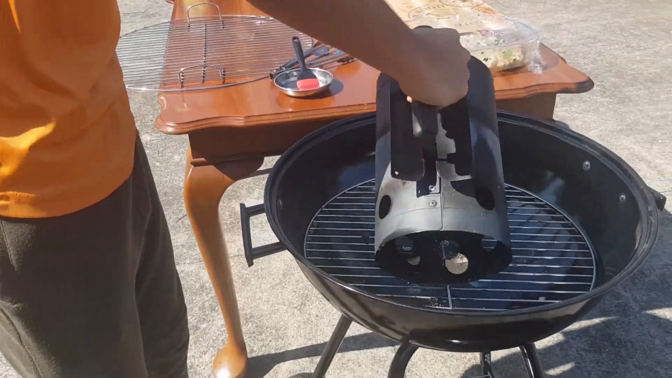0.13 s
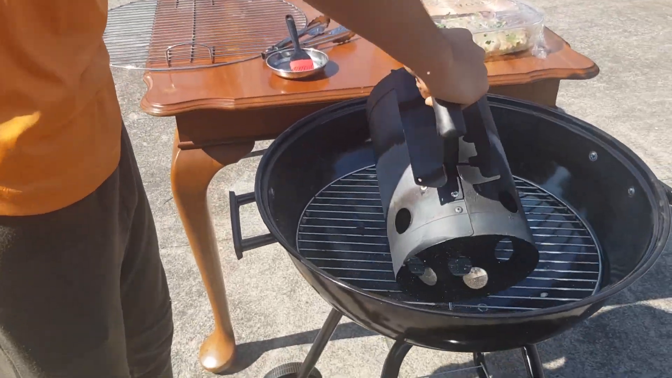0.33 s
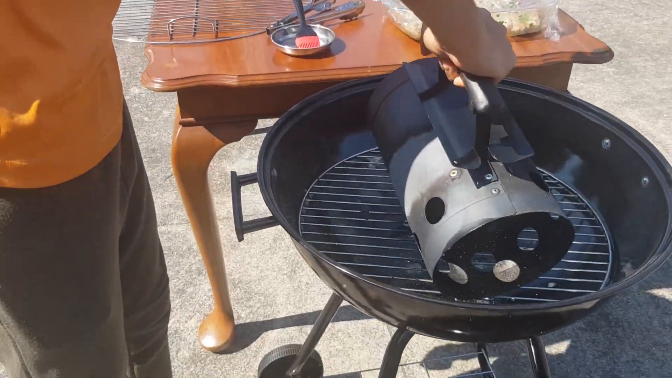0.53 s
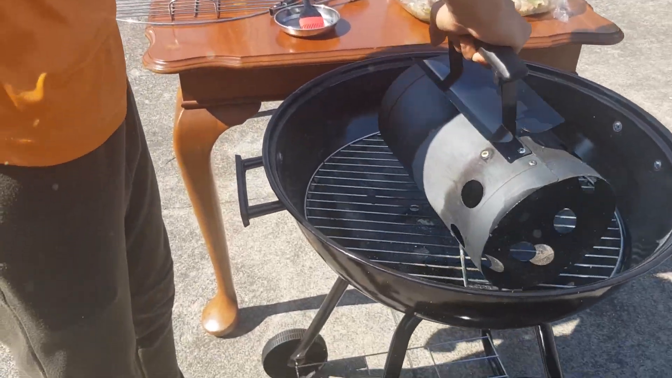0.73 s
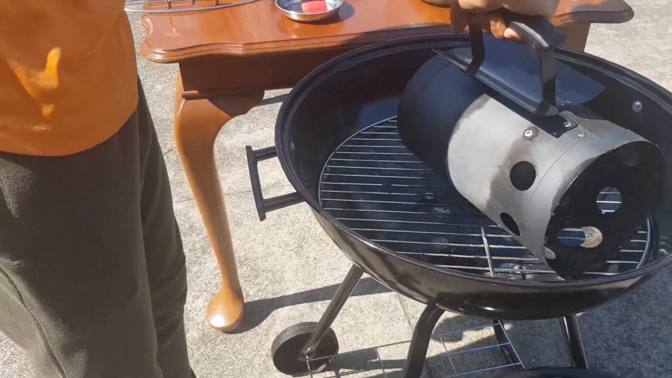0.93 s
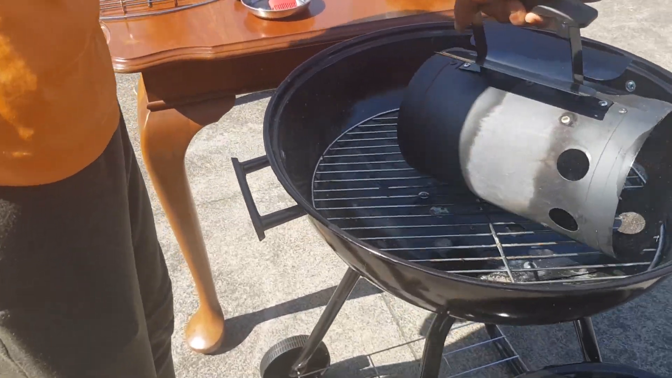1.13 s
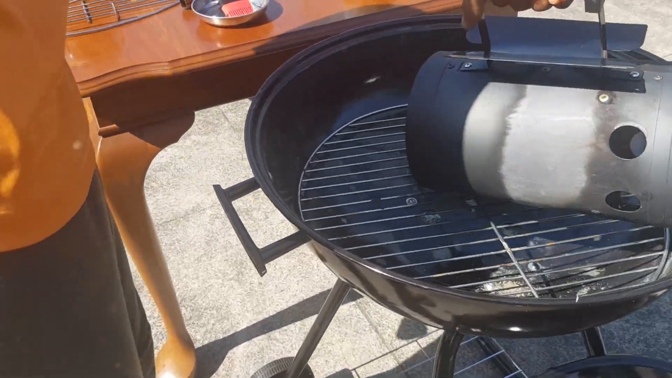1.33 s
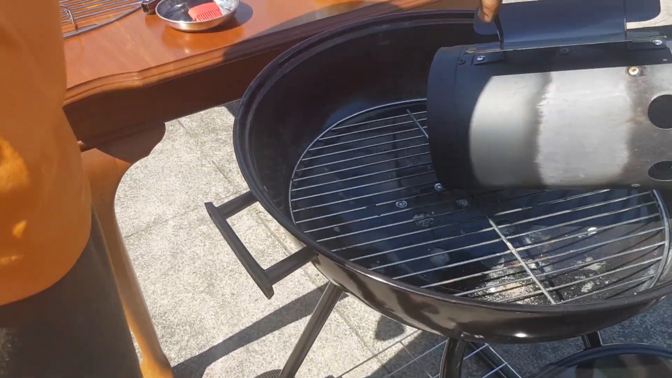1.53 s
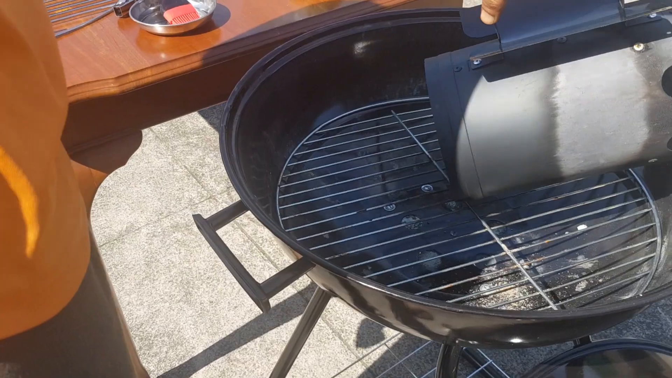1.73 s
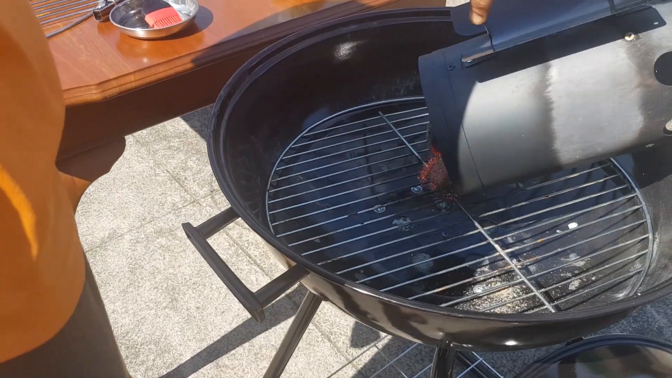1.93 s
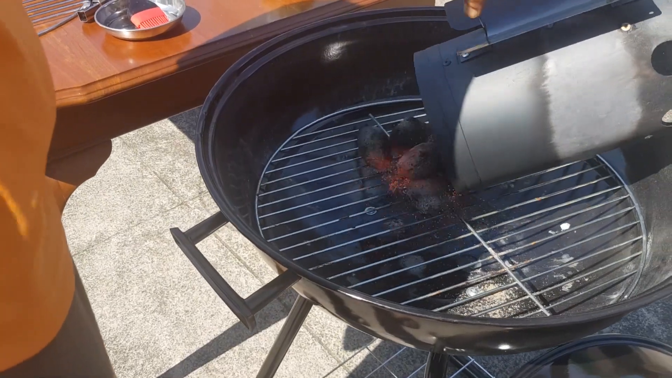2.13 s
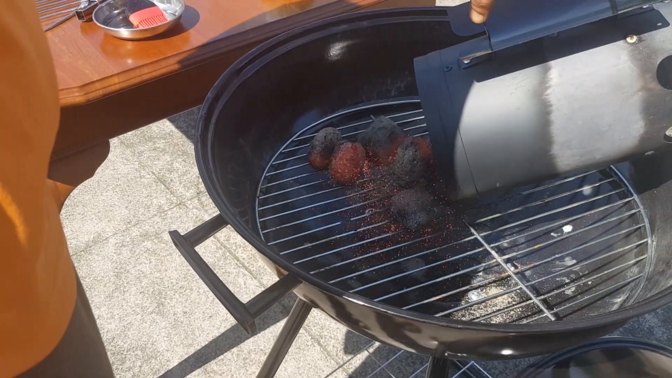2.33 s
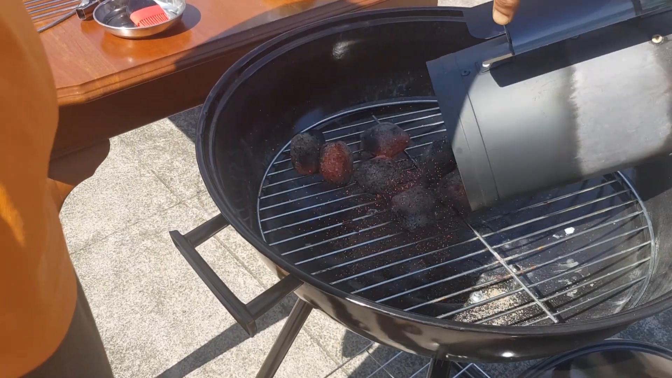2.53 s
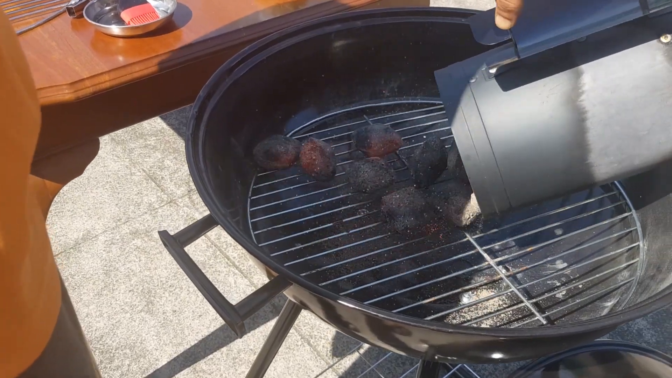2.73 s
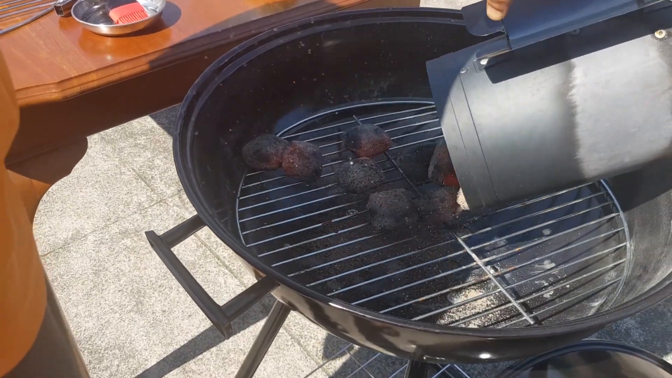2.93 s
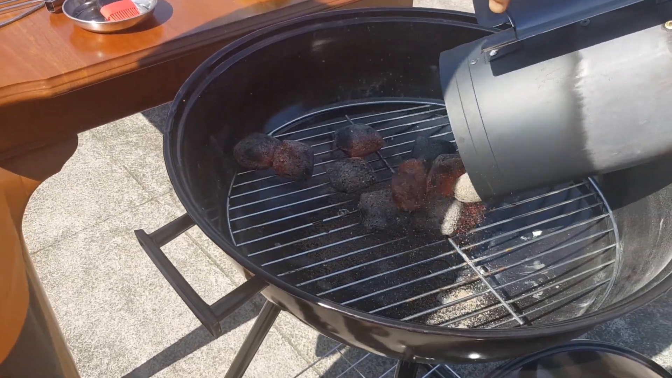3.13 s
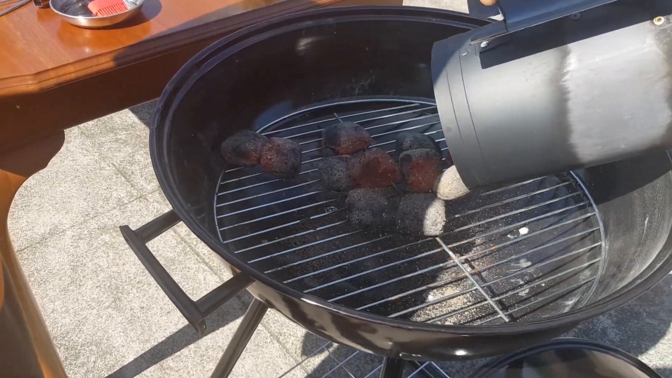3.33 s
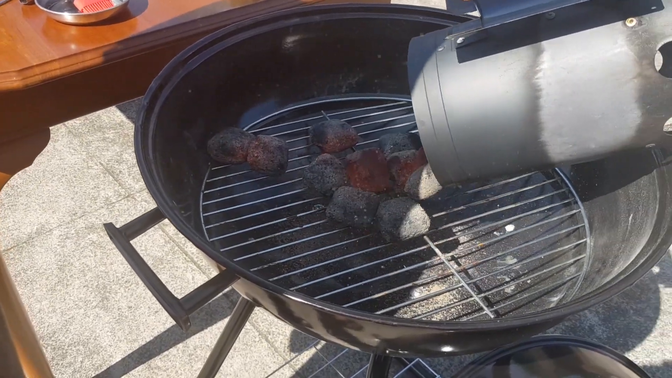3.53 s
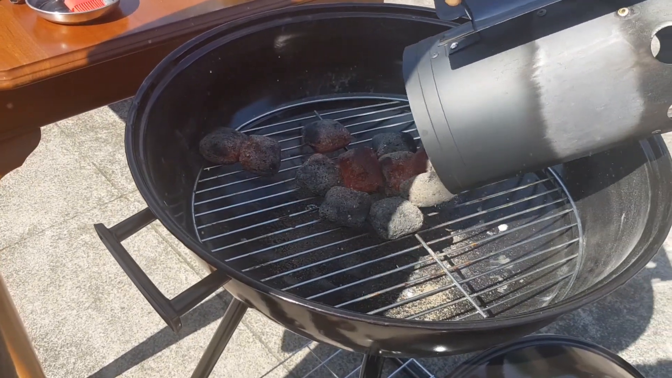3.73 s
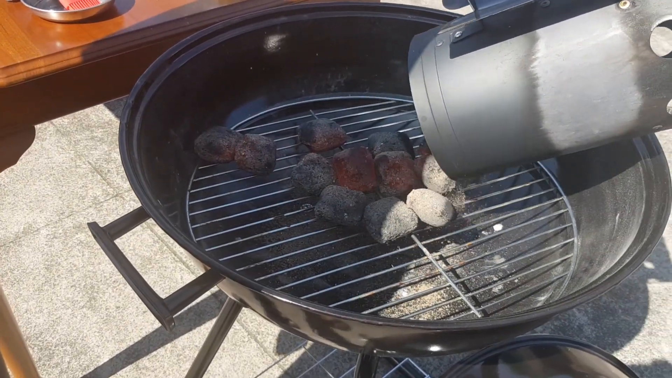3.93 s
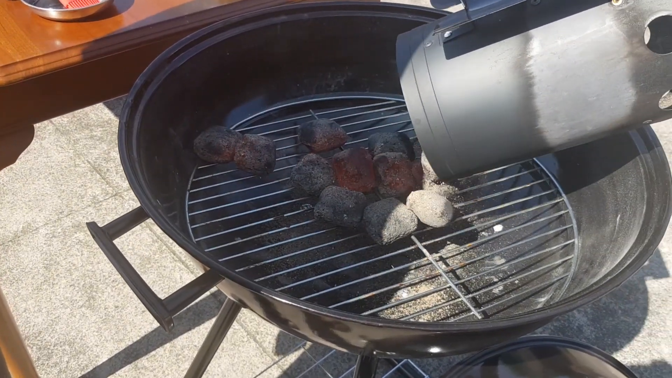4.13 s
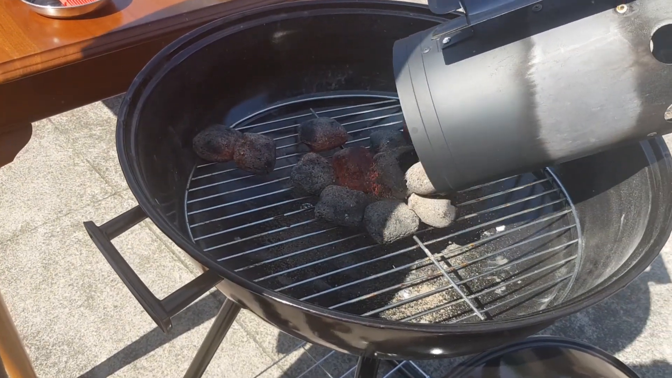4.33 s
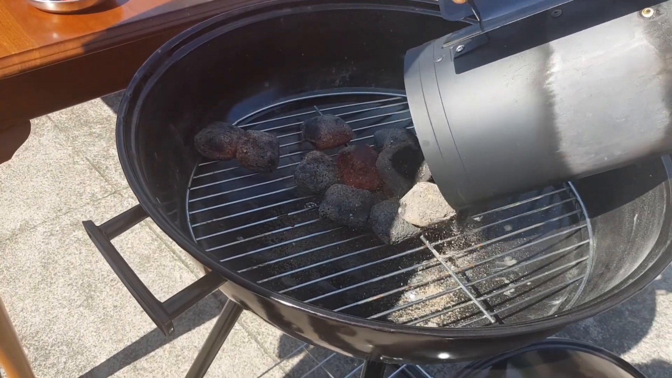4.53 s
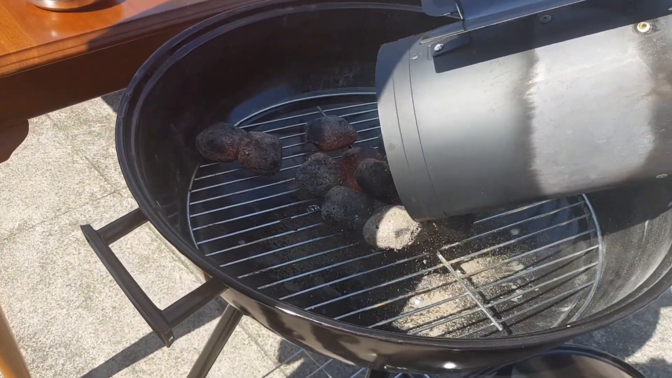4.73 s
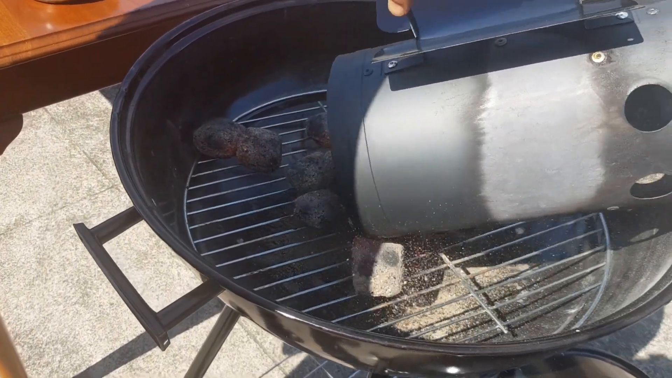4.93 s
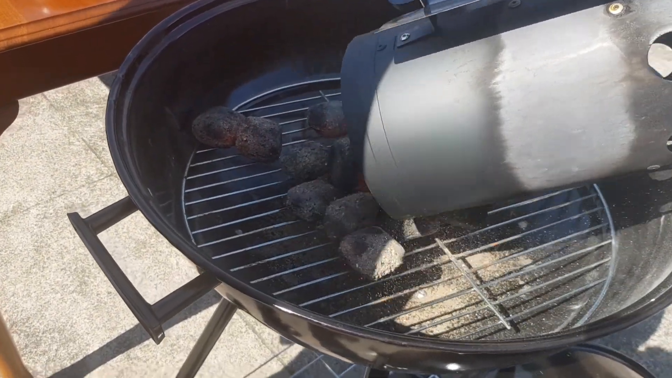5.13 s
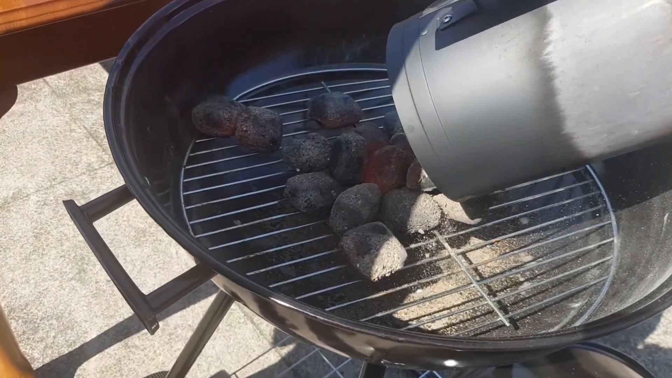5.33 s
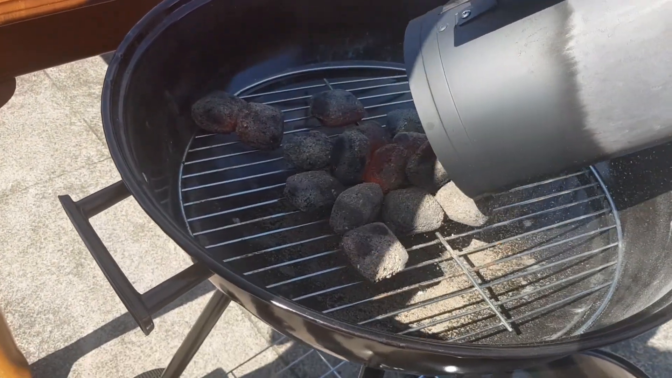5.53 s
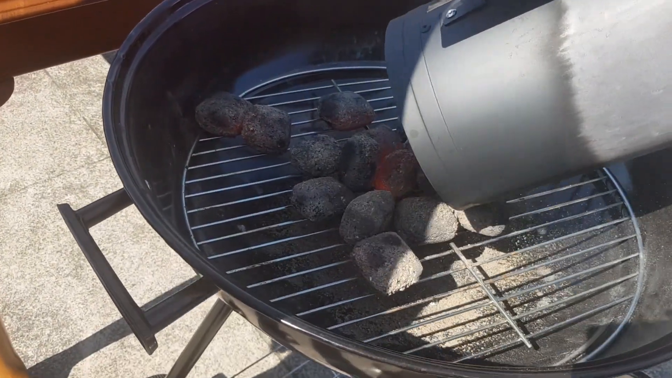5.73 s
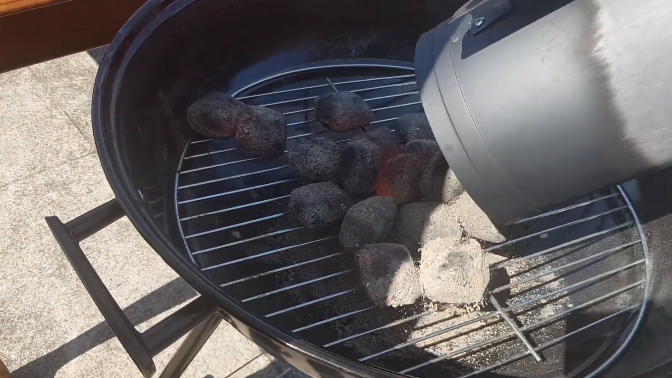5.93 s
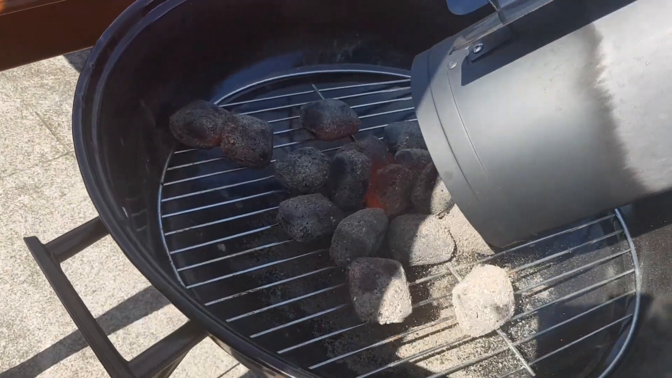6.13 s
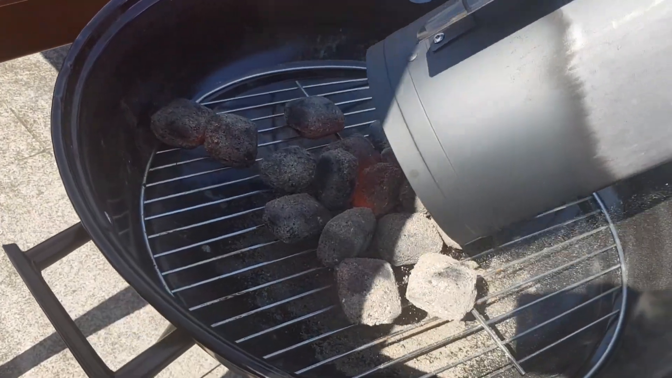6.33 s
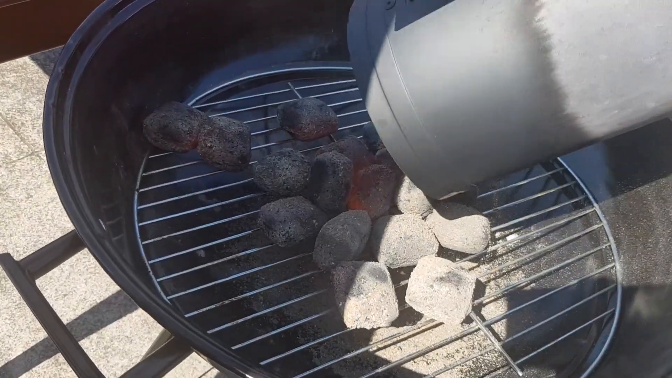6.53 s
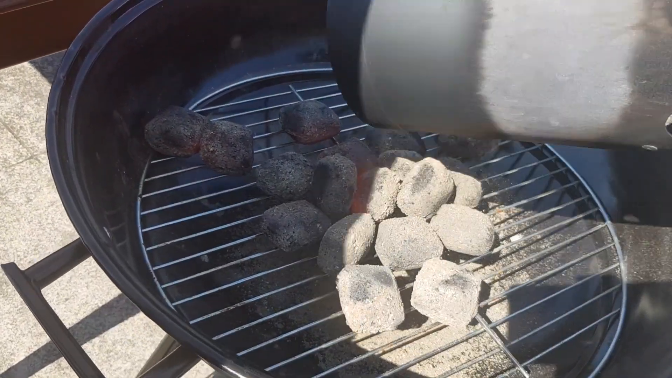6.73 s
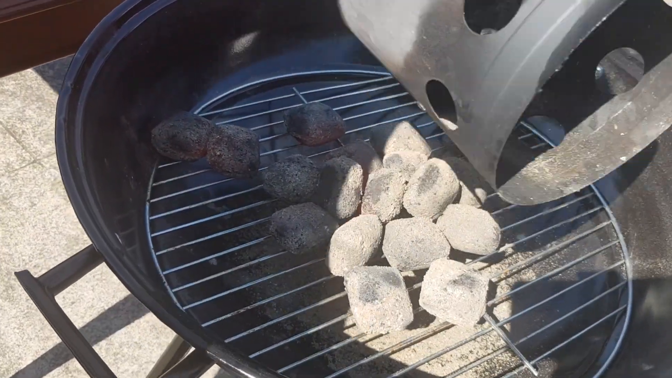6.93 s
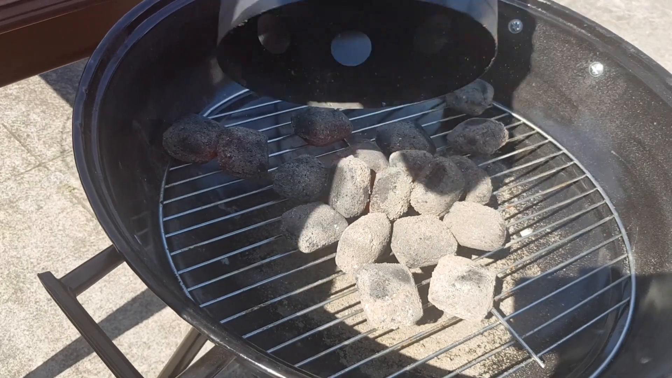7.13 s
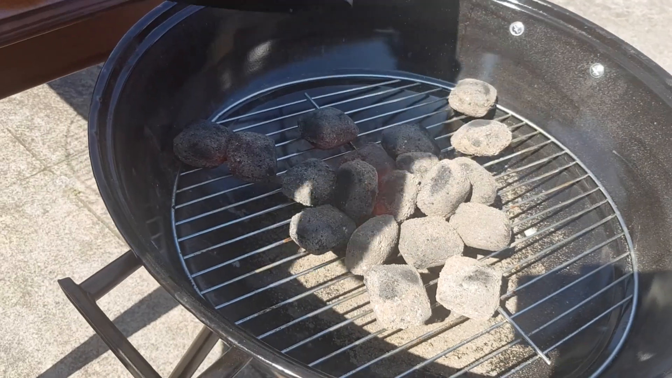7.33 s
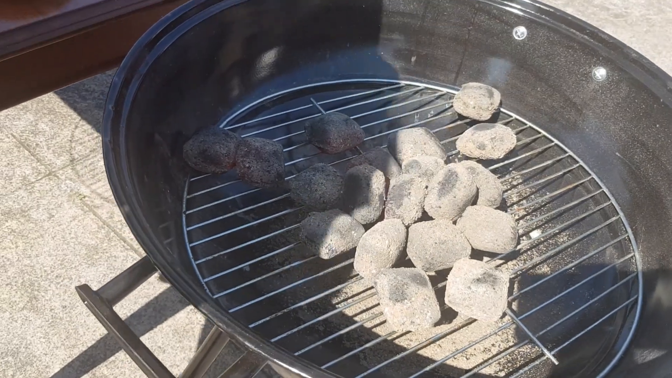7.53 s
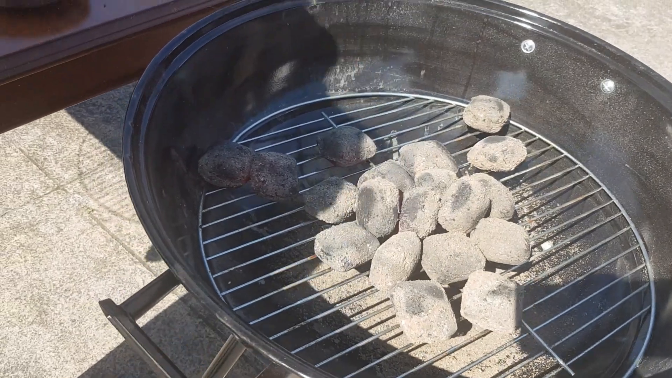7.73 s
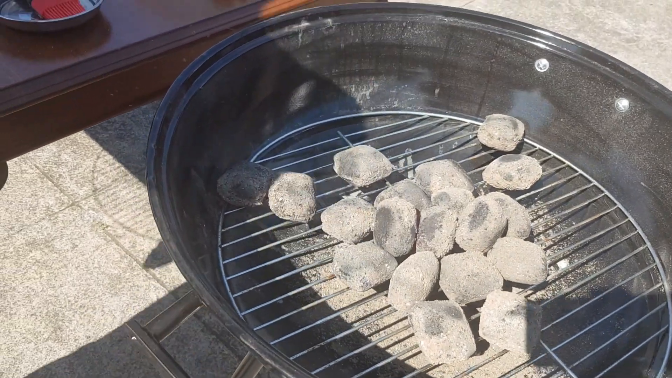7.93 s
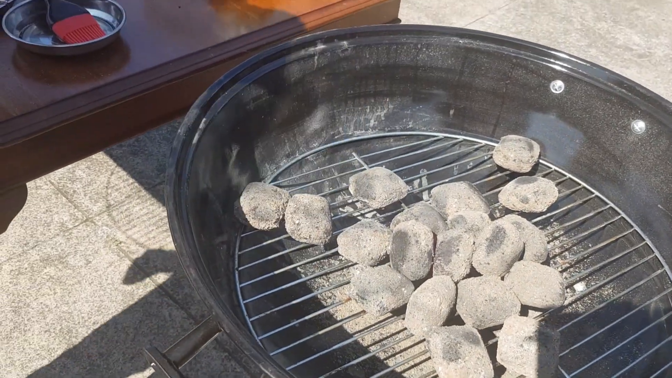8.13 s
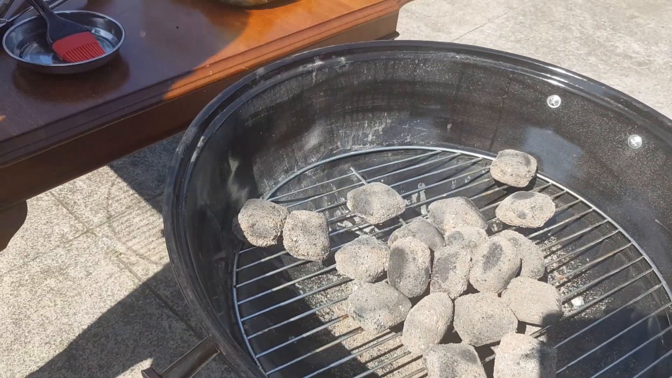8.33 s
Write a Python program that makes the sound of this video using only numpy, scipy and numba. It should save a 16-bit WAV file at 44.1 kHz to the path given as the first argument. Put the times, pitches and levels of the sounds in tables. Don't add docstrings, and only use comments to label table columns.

```python
import sys
import numpy as np
from scipy import signal
from scipy.fft import rfft, irfft
from scipy.io import wavfile
from scipy.ndimage import uniform_filter1d
from numba import njit

SR = 44100
rng = np.random.default_rng(int(sys.argv[2]) if len(sys.argv) > 2 else 0)


def attenuation_scalar(level_db):
    decades = np.asarray(level_db, float) / 20
    return 10 ** decades


def dump_mix(stems):
    frames = np.atleast_2d(stems).T
    limited = np.clip(frames, -1, 1)
    pcm = np.round(limited * 32767).astype(np.int16)
    wavfile.write(sys.argv[1], SR, pcm)


N = 370080
T = np.arange(N) / SR
POUR_S = 1.78

# (frequency [Hz], level [dB per Hz])
YARD_SPECTRUM = [(380, -34.5), (650, -4.5), (1100, -10), (2060, -9.5), (4360, -0.5), (4990, -2),
                 (6350, -9.5), (11800, -8), (15200, -9), (16000, -5.5)]
# (time [s], level [dB])
YARD_SWELL = [(0, 7), (.9, 1.5), (1.25, 1), (1.6, 3.5), (6.6, -0.5), (6.85, 0.5), (7.05, -1.5), (7.5, -0.5),
              (8.0, -2), (8.15, -4), (8.39, -2)]
# (middle [s], half length [s], buffet [dB], flutter re buffet [dB], left minus right [dB])
GUSTS = [(0.683, 0.2, -48.5, -10.5, 4), (0.92, 0.1, -55.5, -12, -24), (1.05, 0.12, -51, -2, 7),
         (1.223, 0.14, -39, -9, 0.5), (1.495, 0.085, -37.5, -10.5, 0), (1.817, 0.14, -37, -7, -9.5),
         (2.043, 0.042, -30.5, -6.5, 0), (2.217, 0.11, -64, -5, -23.5), (2.299, 0.018, -38, -6, -4),
         (4.645, .05, -53.5, -16, 0), (7.209, 0.033, -53, -11, -7.5), (2.568, 0.26, -46, -3, 4.5),
         (3.158, 0.11, -49, -5.5, -7), (4.897, 0.12, -49.5, 0, 1), (5.296, 0.24, -47, -2.5, -12),
         (5.505, 0.076, -41, 3, 0), (5.732, 0.11, -36, -9, -3), (5.964, 0.041, -35.5, -6, -6),
         (6.416, 0.42, -59, 1.5, -10.5), (6.776, 0.082, -51, -13.5, -19.5), (7.067, 0.13, -53.5, -5, -1.5),
         (7.58, 0.28, -49, -7.5, -0.5), (8.115, 0.48, -56.5, -8.5, 7.5), (8.229, 0.087, -51.5, 2, -0.5)]
# (time [s], peak [dB], pitch [Hz], left minus right [dB])
PUFFS = [(0.535, -30.5, 61, -2), (0.605, -25.5, 63.7, -1), (0.823, -37.5, 67, -23), (0.97, -21, 68, -3),
         (1.001, -20.5, 81, 8), (1.06, -26.5, 101, 4), (1.113, -42.5, 81.4, -44), (1.149, -31.5, 45.8, -12),
         (1.122, -47, 377, 0), (1.162, -40, 290, 0), (1.249, -45, 300, 2), (1.292, -33.5, 237, -11),
         (1.385, -36, 188, -2), (1.42, -42, 56.7, -12), (1.444, -16.5, 64, -2), (1.682, -33.5, 134, -24),
         (1.757, -29, 89, -23), (2.028, -36, 62, -1), (2.357, -37.5, 106, 0), (3.163, -38, 73, -20),
         (5.219, -25, 66.4, -5), (5.29, -17, 70, 0), (5.465, -37, 67, -35), (5.68, -26, 113, 8),
         (5.931, -29, 107.4, 8), (6.741, -40, 75.6, -18), (7.449, -30.5, 97.6, 7.5), (7.567, -29, 61, 2.5),
         (7.69, -41, 58.4, 5.5), (7.791, -35.5, 121.7, 11.5), (7.865, -37.5, 58.1, -19.5),
         (8.068, -37, 61.6, -3), (8.155, -34.5, 94, 13), (8.248, -49, 67.3, 25.5)]
# (time [s], flow felt by the grate [dB], can re grate [dB])
TRICKLE = [(0.0, -62.5, 1), (0.14, -74, 22), (0.37, -75, 10.5), (0.75, -66.5, 4.5), (1.33, -83.5, 13),
           (1.75, -70, 2), (2.62, -49, -14), (2.99, -56.5, -3), (3.2, -43.5, -16), (3.64, -57, 1.5),
           (4.3, -62.5, 0), (4.6, -51, -6), (5.0, -46.5, -2.5), (5.26, -46.5, -8), (5.42, -78.5, 13.5),
           (5.7, -49, -3), (6.17, -60.5, -9), (6.6, -104, 10)]
# (time [s], flow felt by the grate [dB], can re grate [dB])
POUR = [
    (1.818, -48, -3.5),
    (1.98, -37, 5),
    (2.05, -18.5, -8.5),
    (2.1, -16.5, -3.5),
    (2.16, -23, -3),
    (2.22, -23.5, -8.5),
    (2.289, -33, -5.5),
    (2.35, -36, -17),
    (2.62, -74, 18.5),
]
# (time [s], can [dB], grate re can [dB], bowl re
# can [dB], grit re can [dB])
KNOCKS = [(0.1242, -35.5, -7.5, -16, -4), (1.495, -44, -6, -13, 0.5), (2.676, -34, 0.5, -2, -11),
          (2.933, -37.5, -7.5, -9, -10), (2.984, -39.5, -1.5, -7.5, -8), (3.0459, -37.5, 0.5, 2.5, -20),
          (3.075, -37, 8, -1.5, -7.5), (3.1097, -37.5, -3, -7, -5), (3.16, -30.5, -6, -7.5, -9),
          (3.2027, -40, -9, -15, -7), (3.2293, -25, -3.5, -4.5, -8), (3.411, -32.5, -1.5, -5.5, -9.5),
          (3.912, -23.5, -8, -10, -9), (4.5353, -39, -16, -19, -7), (5.243, -44, 14, 15.5, -24.5),
          (5.909, -35.5, -4, -5, -12), (6.241, -37.5, 3, 1, -13), (6.6718, -54.5, 5.5, 3.5, -4),
          (6.786, -53.5, -6, -10.5, -7), (7.332, -46.5, -13, -7, -9),
          (1.935, -34.5, 7, 9, -15), (1.9733, -22.5, -9, 2, -8), (2.021, -13, -3.5, -16.5, -17),
               (2.033, -25.5, 0, -5, -9), (2.0662, -22.5, 2, -9.5, -6), (2.0853, -17, 0.5, -1, -11.5),
               (2.0941, -12.5, 4.5, -11, -8.5), (2.11, -25, -4, -16, -14), (2.122, -15.5, 5, -10.5, -9),
               (2.137, -28, 0.5, -16, -14), (2.152, -18, 5.5, -21, -12), (2.164, -28, 11, -2, -17.5),
               (2.182, -21, 5, -10.5, -12), (2.204, -21, 3, -4.5, -8), (2.237, -29, 7, -7, -3),
               (2.252, -22, 5.5, -8.5, -22), (2.275, -23.5, -6, -24, -34), (2.309, -28, -7, -18, -19),
               (4.8159, -21, 1, -1, -5.5), (4.892, -32.5, 2.5, 3, -2.5), (5.0206, -40.5, -9, -0.5, 0),
               (5.0673, -38, -8, -10, -5), (5.6736, -44, -5, -9, -13), (5.809, -35.5, 4.5, -3.5, -8),
               (5.986, -28.5, -7, -13, -9), (6.004, -33, -10, -5.5, -13), (6.302, -31.5, 4, -8, -15)]
# (time [s], blow [dB], bowl re blow [dB], can re blow [dB], chatter length [s])
SHIFTS = [
    (0.163, -38.5, -14.5, -5.5, 0.022),
    (0.271, -39, -4, -33, 0.0029),
    (0.698, -43.5, -84, -5, 0.017),
    (0.755, -34, -14.5, -5, 0.0063),
    (1.396, -43.5, -35, -0.5, 0.019),
    (1.681, -40.5, -12, -1, 0.061),
]
# (time [s], blow [dB], bowl and can re blow [dB], chatter length [s])
RUSH_LUMPS = [
    (1.821, -26, -5, -6, 0.0087),
    (1.923, -10.5, -13, -9, 0.005),
    (1.96, -19, -29, -13, 0.034),
    (2.0208, -5, -15, -3, 0.0037),
    (2.394, -22, -19, -10, 0.023),
    (2.578, -39, -1, -9, 0.0045),
    (2.622, -34.5, -19, -2.5, 0.0076),
    (2.741, -29.5, -15, -11, 0.0051),
]
# (time [s], blow [dB], bowl and can re blow [dB], chatter length [s])
SHAKEN_LUMPS = [(3.7763, -20.5, -13.5, -9, 0.011), (3.9037, -16.5, -13, -10, 0.018),
                (4.022, -34.5, -14, -25, 0.026), (4.076, -39, -10, -4.5, 0.049),
                (4.23, -39, -7, -15, 0.021), (4.305, -30.5, -11.5, -12.5, 0.015),
                (4.376, -35.5, -9.5, -3, 0.015), (4.57, -17.5, -11.5, -13, 0.012),
                (4.796, -16.5, -13, -11.5, 0.027), (4.914, -36, -4, -4.5, 0.03),
                (5.086, -26.5, -7.5, -12, 0.0072), (5.374, -30, -7, -15.5, 0.007),
                (5.429, -35, -23.5, -8.5, 0.0037), (5.65, -44, -7, 6.5, 0.016),
                (5.804, -24, -11, -23.5, 0.0035), (5.962, -9, -14.5, -11, 0.0075),
                (5.974, -12.5, -15, -1, 0.002), (6.156, -30.5, -9.5, -6, 0.002),
                (6.2889, -20.5, -15, -17, 0.0064), (6.396, -38, -13, -8.5, 0.0082)]
# (lowest [Hz], highest [Hz], time to fade 60 dB [s], blow [dB], slide [dB], side re mid [dB])
PARTS = [
    (1178, 3280, 0.18, -5.5, -3, -3),
    (70, 956, 0.24, 4.5, -9, -11.5),
    (2410, 6380, 0.23, -1.5, -1.5, 0.5),
    (7170, 13900, 0.19, 5, -1.5, 0.5),
]
# (frequency [Hz], level [dB per Hz])
STEEL_SPECTRUM = [(60, -24.5), (130, -19.5), (200, -12.5), (286, -16), (341, -12.5), (466, -10.5),
                  (560, -17.5), (680, -20), (1040, -21.5), (1240, -9), (1580, -3), (2600, -16.5),
                  (4800, -14), (7300, -20), (9200, -20.5), (16000, -27)]
# (frequency [Hz], level [dB per Hz])
CAN_SPECTRUM = [(180, -5.5), (300, -6.5), (385, -1.5), (1390, -14.5), (1560, -9.5), (2170, -6.5),
                (3030, -13), (10700, -9), (16000, -16)]
# (frequency [Hz], level [dB], time to fade 60 dB [s])
GRATE_MODES = [(1330, -28, .1), (1483, -13, .18), (1555, -9.5, .21), (1626, -11, .18), (1845, -15, .13),
               (2012, -16, .13), (2105, -15, .13), (2417, -16, .15)]
# (frequency [Hz], level [dB], time to fade 60 dB [s])
BOWL_MODES = [(338, -15, .13), (555, -20, .1), (581, -34, 1.0), (750, -35, 1.0)]
# (frequency [Hz], level [dB], time to fade 60 dB [s])
SHELL_MODES = [(2900, -18, .1), (3114, -13.5, 0.2), (3800, -32, 0.21), (4678, -23.5, 0.056),
               (4710, -27, 0.071), (5000, -15, 0.082)]
# (time [s], peak [dB])
TICKS = [(0.3336, -47), (0.404, -45), (0.454, -44), (0.4854, -49), (0.5417, -45), (2.5012, -40),
         (4.0672, -47), (4.0816, -48), (4.399, -29), (4.5354, -38), (4.9327, -31), (4.996, -36),
         (5.1741, -37), (5.3044, -40.5), (5.5428, -45), (5.6341, -36), (5.7508, -38), (5.7972, -38),
         (5.903, -41.5), (7.1906, -56.5)]
# (time [s], level [dB], pitch [Hz], width [Hz], decay [s])
TAPS = [(0.337, -46, 4320, 900, 0.0096), (0.402, -42, 4300, 900, 0.012), (.455, -50, 4320, 700, 0.011),
        (0.486, -44, 4220, 700, 0.0061), (.54, -49, 4260, 400, 0.0059), (1.59, -50.5, 4850, 294, 0.015),
        (6.589, -44, 576, 375, 0.0095), (7.153, -54, 1027, 920, 0.041), (7.17, -54, 3910, 5980, 0.03),
        (7.444, -54.5, 1150, 706, 0.024), (7.445, -55, 3010, 905, 0.021), (7.76, -55, 5980, 5000, 0.0065),
        (7.936, -57, 4830, 1502, .008), (8.019, -65, 1303, 880, 0.024)]
# (time [s], level [dB])
EMBERS = [(1.64, -80), (1.72, -54), (1.9, -39), (2.2, -63), (2.4, -77), (2.6, -74), (2.75, -79),
          (2.97, -71), (3.13, -55), (3.4, -68), (3.55, -63.5), (3.7, -54.5), (3.87, -56), (4.15, -55),
          (4.27, -62), (4.4, -67), (4.6, -61), (4.98, -55), (5.2, -69), (5.44, -69), (5.7, -69), (5.9, -75),
          (6.1, -80)]
# (time [s], level [dB], pitch [Hz], width [Hz], decay [s])
RATTLES = [(1.711, -70, 2170, 700, 0.062), (2.061, -21.5, 4420, 500, 0.093), (2.091, -29, 5170, 597, 0.14),
           (2.17, -29, 3300, 400, 0.061), (2.23, -28, 4200, 490, 0.033), (3.05, -47, 5000, 700, 0.11),
           (3.331, -55, 5000, 900, 0.19), (3.78, -47, 3000, 500, 0.079), (3.911, -33, 1910, 400, 0.028),
           (3.915, -36, 5070, 500, .03), (4.02, -43.5, 5000, 500, 0.024), (4.175, -49, 3620, 200, 0.026),
           (4.315, -48, 2900, 500, 0.029), (4.39, -52, 4600, 1500, 0.031), (4.582, -30, 2500, 900, 0.0093),
           (4.721, -53.5, 5270, 600, 0.18), (4.405, -40.5, 2300, 200, 0.022),
           (4.809, -31, 3180, 250, 0.043), (4.88, -40.5, 3230, 200, 0.099), (4.921, -41, 1960, 300, 0.045),
           (5.04, -52, 3380, 300, 0.099), (5.07, -43, 1960, 300, 0.047), (5.08, -50, 5200, 506, 0.032),
           (5.16, -51.5, 5050, 600, 0.067), (5.181, -53, 3300, 400, 0.049), (5.245, -49, 3320, 300, 0.032),
           (5.645, -49, 2330, 200, 0.11), (5.662, -48, 3330, 200, 0.08), (5.65, -47, 4350, 302, 0.051),
           (5.72, -46, 5300, 400, 0.024), (5.81, -40, 3880, 200, 0.015), (5.91, -44, 2800, 250, 0.018),
           (5.925, -33, 1640, 300, 0.012), (5.975, -15.5, 5020, 397, 0.0098)]
# (time [s], frequency [Hz], level [dB], time to fade 60 dB [s])
PINGS = [(5.811, 1538, -35, .2), (5.811, 1579, -35, .2), (5.811, 1655, -41, .16), (5.974, 1532, -24, .24),
         (5.974, 1595, -24, .24), (5.975, 336, -28, .22), (4.81, 752, -58, 1.9), (5.28, 752, -63, 1.5),
         (5.97, 752, -59, 2.2), (5.97, 748.5, -68, 1.9), (6.29, 752, -65, 2.2), (5.97, 583, -54, .9),
         (1.819, 500, -26, .09), (1.914, 510, -29, .2), (5.24, 800, -62, 1.0), (5.545, 2310, -58, .6),
         (5.82, 800, -62, 1.0), (5.98, 3338, -33, .16), (6.671, 1520, -52, .06)]
# (middle [s], length [s], pitch [Hz], level [dB])
SQUEAKS = [
    (7.09, .15, 2620, -70),
    (7.875, .035, 4320, -67),
    (6.725, .05, 2228, -70),
    (7.135, .08, 4900, -71),
    (7.16, .03, 4200, -72),
    (8.3, .09, 7200, -78),
]


def level(x, db):
    return x * attenuation_scalar(db) / np.sqrt(np.mean(x ** 2))


def colour(table, hz):
    f, db = np.transpose(table)
    return np.interp(np.log(np.maximum(hz, 1)), np.log(f), db)


def band(x, lo_hz, hi_hz):
    return signal.sosfilt(signal.butter(2, [lo_hz, hi_hz], "band", fs=SR, output="sos"), x)


def walk(rate):
    hold = int(SR / rate)
    steps = np.repeat(rng.standard_normal(N // hold + 1), hold)
    return 1.2 * uniform_filter1d(steps, hold)[:N]


def contacts(rate, scatter_db):
    size = attenuation_scalar(scatter_db * rng.exponential(size=N)) * rng.standard_normal(N)
    return level(size * (rng.random(N) < rate / SR), 0)


def yard():
    shape = attenuation_scalar(colour(YARD_SPECTRUM, np.fft.rfftfreq(N, 1 / SR)))
    hiss = irfft(rfft(rng.standard_normal((2, N))) * shape, N)
    swell_db = .6 * walk(6) + np.interp(T, *np.transpose(YARD_SWELL))
    return level(hiss, -69 + 6.5) * attenuation_scalar(swell_db)


def puffs(side):
    out = np.zeros(N)
    for start, peak_db, hz, pan_db in PUFFS:
        cycles = (T - start) * hz - 1.2
        turn = .52 - 0.048 * side + .07 * rng.standard_normal()
        push = np.exp(-(cycles / 0.39) ** 2) * np.cos(2 * np.pi * (cycles + turn))
        out += attenuation_scalar(peak_db + side * pan_db / 2) * push
    return out


def wind():
    middle, half, db, flutter_db, pan_db = np.transpose(GUSTS)
    coarse = T[::64]
    swell = np.exp(-np.abs((coarse[:, None] - middle) / half) ** 3.0)
    out = []
    for side, breeze_db in ((1, -83.5), (-1, -62)):
        eddies = contacts(400, 1.6) * attenuation_scalar(2.6 * walk(18))
        buffet = level(band(band(eddies, 35, 125.4), 35, 180), 3.3)
        flutter = level(band(band(eddies * attenuation_scalar(2.0 * walk(30)), 110, 330), 84, 480), 1)
        gust_db = db + side * pan_db / 2
        low = swell @ attenuation_scalar(gust_db) + attenuation_scalar(breeze_db)
        high = swell @ attenuation_scalar(gust_db + flutter_db) + attenuation_scalar(breeze_db - 10)
        port = np.interp(T, coarse, low) * buffet + np.interp(T, coarse, high) * flutter
        out.append(band(port + puffs(side), 26, 3000))
    return np.array(out)


def flow(part):
    total = 0
    for table in (TRICKLE, POUR):
        s, db, fine_db = np.transpose(table)
        can_db = db + fine_db
        felt = (db, -12.5 + 0.69 * db, can_db, -15 + 0.81 * can_db)[part]
        last = felt[-1] if table is TRICKLE else -120
        total = total + attenuation_scalar(np.interp(T, s, felt, left=-120, right=last))
    return total


def knocks(part):
    force = np.zeros(N)
    part_gain_db = (21.4, 22.2, 18.6, 20.4)[part]
    for s, db, grate_db, bowl_db, grit_db in KNOCKS:
        force[int(s * SR)] = attenuation_scalar(db + (grate_db, bowl_db, 0, grit_db)[part] + part_gain_db)
    age = T[:SR // 20]
    rebounds = 0.0062 * np.exp(-age / 0.0074) * rng.standard_normal(len(age))
    rebounds[0] = 1
    return signal.oaconvolve(force, rebounds)[:N]


def cracks():
    burst, age = rng.standard_normal((2, SR // 50)), T[:SR // 50]
    crunch = band(burst * np.exp(-age / 0.0024), 2500, 6000)
    tick = attenuation_scalar(4) * band(burst[::-1] * np.exp(-age / .0006), 3600, 7500)
    return attenuation_scalar(-16.0) * signal.oaconvolve([knocks(2)], crunch + tick, axes=1)[:, :N]


def blows(part):
    force, rolling = np.zeros((2, N))
    for s, db, bowl_db, can_db, length in SHIFTS + RUSH_LUMPS + SHAKEN_LUMPS:
        start = int(s * SR)
        since = T[:min(N - start, SR // 2)]
        end = start + len(since)
        age = since / max(length, .002)
        touch = .4 if s > POUR_S else .02
        grit_db = can_db - 19.5 - .27 * db
        gain = attenuation_scalar(db + (0, bowl_db, can_db, grit_db)[part])
        force[start:end] += gain * (touch + age) * np.exp(-age)
        rolling[start:end] += gain * attenuation_scalar(-32.5) * np.exp(-since / 0.077)
    return force, rolling


def crowd(table, lo_hz, hi_hz, t60, side_db):
    age = T[:SR // 3]
    hz = np.fft.rfftfreq(len(age), 1 / SR) + 1
    edges = (1 + (lo_hz / hz) ** 16) * (1 + (hz / hi_hz) ** 16)
    shape = attenuation_scalar(colour(table, hz)) / np.sqrt(edges)
    ripple = np.sin(11.0 * np.log(hz) * (1 + rng.random()) + 2 * np.pi * rng.random())
    shape = shape * attenuation_scalar(2.1 * ripple)
    fade = attenuation_scalar(-60 * age / t60) + .7 * np.exp(-age / 0.003)
    mid, side = irfft(rfft(rng.standard_normal((2, len(age)))) * shape, len(age)) * fade
    ports = np.array([mid + attenuation_scalar(side_db) * side, mid - attenuation_scalar(side_db) * side])
    return ports / np.sqrt(np.sum(mid ** 2))


@njit
def ring(drive, pole, gain, spot):
    out = np.zeros((2, len(drive)))
    for m in range(len(pole)):
        z = 0j
        for i in range(len(drive)):
            z = z * pole[m] + drive[i] * spot[m, i >> 10]
            out[0, i] += (z * gain[m]).imag
            out[1, i] += (z * gain[m].conjugate()).imag
    return out


def steel(drive, hz, db, t60, scatter, spot_db):
    radius = np.exp(-np.log(1000) / (t60 * SR))
    pole = radius * np.exp(2j * np.pi * hz / SR)
    turn = np.exp(.5j * scatter * rng.standard_normal(len(hz)))
    gain = attenuation_scalar(db) * np.sqrt(2 * (1 - radius ** 2)) * turn
    spot = attenuation_scalar(spot_db * rng.standard_normal((len(hz), N // 1024 + 1)))
    spot = spot * rng.choice([-1., 1.], (len(hz), 1))
    return ring(drive + 1e-18, pole, gain, spot)


def coals(count=4):
    chatter = contacts(3000, 2.67)
    roll = contacts(3000, 2.4) * attenuation_scalar(1.7 * walk(25))
    out = cracks()
    spot = attenuation_scalar(13.3 * np.array([walk(30) for _ in range(count)]))
    shares = spot / np.sqrt(np.sum(spot ** 2, axis=0))
    poured = T > POUR_S
    for part, (lo, hi, t60, blow_db, slide_db, side_db) in enumerate(PARTS):
        force, rolling = blows(part)
        drive = attenuation_scalar(blow_db) * (force * chatter + rolling * roll)
        drive = drive + knocks(part) + attenuation_scalar(slide_db) * flow(part) * roll
        for share in shares:
            struck = drive * share
            response = crowd(STEEL_SPECTRUM, lo, hi, t60, side_db)
            out += signal.oaconvolve([struck * poured], response, axes=1)[:, :N]
            response = crowd(CAN_SPECTRUM, lo, hi, t60, side_db)
            inside = signal.oaconvolve([struck[~poured]], response, axes=1)
            out[:, :inside.shape[1]] += inside
        if part < 3:
            modes = np.transpose((GRATE_MODES, BOWL_MODES, SHELL_MODES)[part])
            scatter, spot_db = (.6, .4, 2.5)[part], (4.0, .6, 4.0)[part]
            tones = steel(drive * poured, *modes, scatter, spot_db)
            out += tones * attenuation_scalar((-2.5, 0.1, 0.1)[part])
    return out


def ticks(gain_db=-7, decay_s=0.012):
    out, age = np.zeros((2, N)), T[:SR // 20]
    for s, db in TICKS:
        start = int(s * SR)
        fizz = level(band(rng.standard_normal((2, len(age))), 6800, 14000), db + gain_db)
        out[:, start:start + len(age)] += fizz * np.exp(-age / decay_s)
    return out


def taps():
    out, age = np.zeros((2, N)), T[:SR // 6]
    for s, db, hz, width, decay in TAPS:
        start = int(s * SR)
        noise = rng.standard_normal((2, len(age)))
        tap = level(band(noise, max(hz - width / 2, 50), hz + width / 2), db)
        out[:, start:start + len(age)] += tap * np.exp(-age / decay) * (1 - np.exp(-age / 0.0004))
    return out


def embers():
    sifting_db = np.interp(T, *np.transpose(EMBERS), left=-120, right=-120) + 3.5 * walk(24)
    grains = np.array([contacts(2500, 3.4), contacts(2500, 3.4)])
    return attenuation_scalar(sifting_db) * level(band(grains, 8800, 10400), 0)


def rattles(rise_s=0.0031, side_db=-5):
    out, age = np.zeros((2, N)), T[:SR // 3]
    for s, db, hz, width, decay in RATTLES:
        start, half = int(s * SR), max(width, 40) / 2
        noise = rng.standard_normal((2, len(age)))
        strength = attenuation_scalar(2.2 * rng.exponential(size=len(age)))
        hits = noise * strength * (rng.random(len(age)) < .06)
        fade = np.exp(-(age / decay) ** 1.2) * (1 - np.exp(-age / rise_s))
        mid, side = level(band(hits, hz - half, hz + half), db) * fade
        out[:, start:start + len(age)] += [mid + attenuation_scalar(side_db) * side, mid - attenuation_scalar(side_db) * side]
    return out


def pings(rise_s=.002, side_db=-10):
    out = np.zeros((2, N))
    for s, hz, db, t60 in PINGS:
        age = np.maximum(T - s, 0)
        turn = attenuation_scalar(side_db) * rng.standard_normal() * np.array([[1], [-1]])
        fade = attenuation_scalar(db - 60 * age / t60 + 1.5 * walk(15)) * (1 - np.exp(-age / rise_s))
        out += fade * np.sin(2 * np.pi * hz * age + turn)
    return np.sqrt(2) * out


def hinge():
    out = 0
    for s, length, hz, db in SQUEAKS:
        place = (T - s) / length * 2
        bend = .55 * np.clip(place, -1.5, 1.5) ** 2 + 3.2 * length * walk(400)
        pitch = hz * (1 + length * bend)
        tone = np.sin(2 * np.pi * np.cumsum(pitch) / SR)
        out = out + attenuation_scalar(db + 5.6 * walk(150)) * np.exp(-place ** 4) * tone
    return out


def scene():
    return coals() + taps() + hinge() + wind() + yard() + embers() + rattles() + ticks() + pings()


def top_cut(x):
    return signal.sosfilt(signal.butter(12, 16660, fs=SR, output="sos"), x)


def record(dry):
    rounded = np.tanh(.8 * dry) / .8
    top = signal.ellip(8, .2, 50, 15850, fs=SR, output="sos")
    mix = signal.sosfilt(top, rounded)
    return top_cut(mix)


dry = scene()
out = record(dry)
dump_mix(out)
```